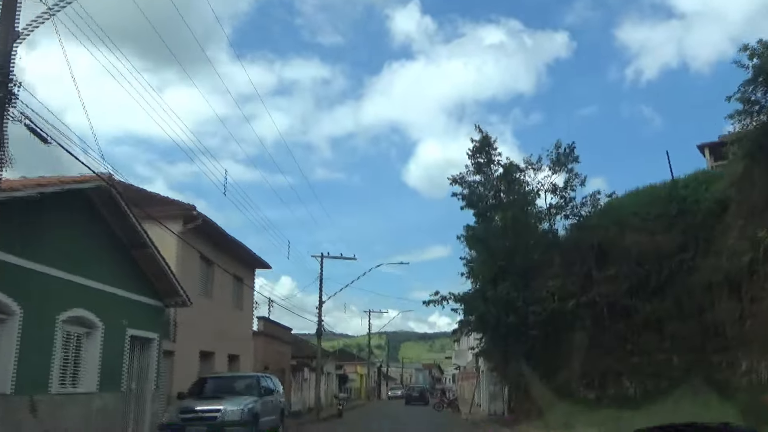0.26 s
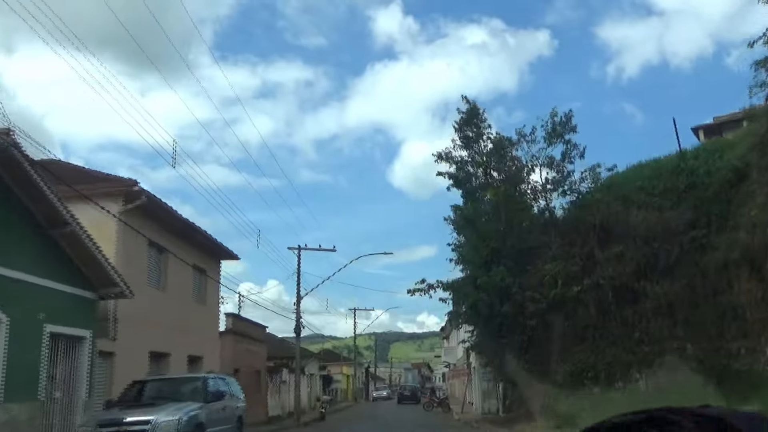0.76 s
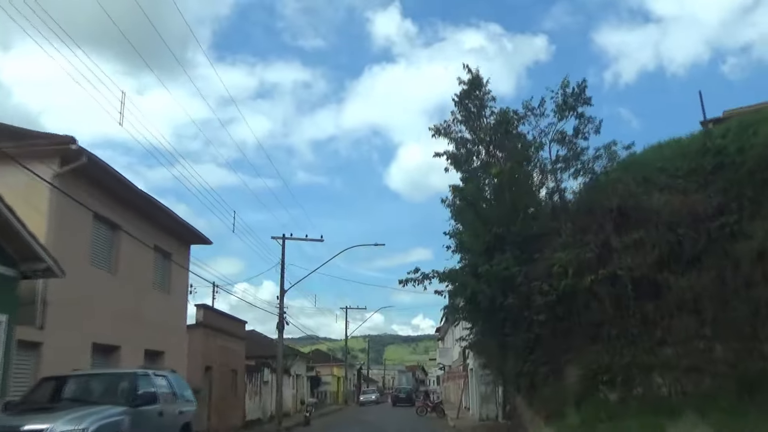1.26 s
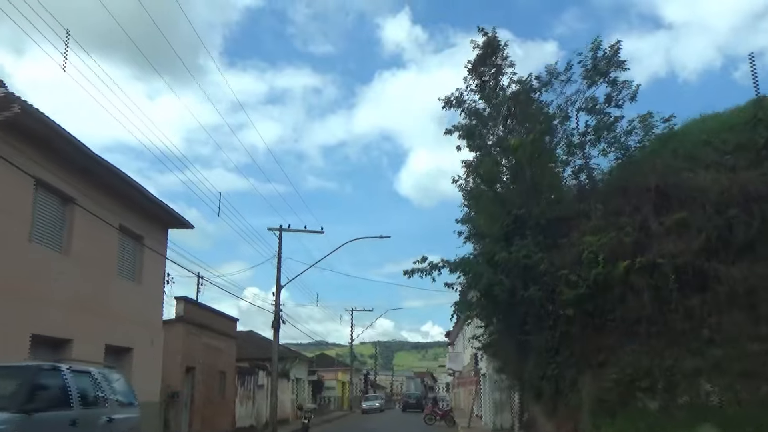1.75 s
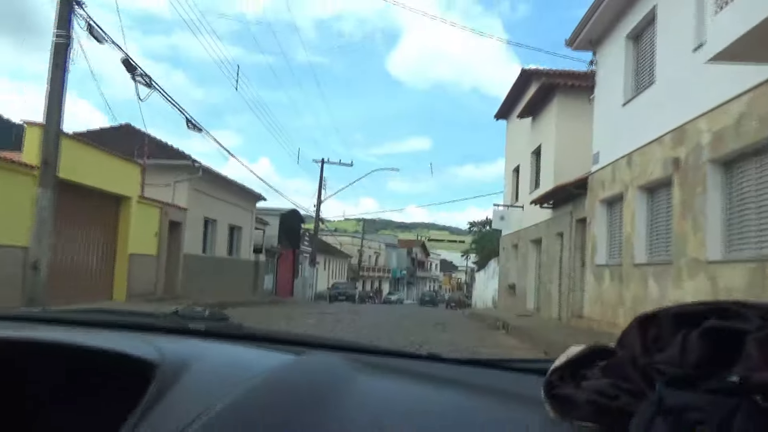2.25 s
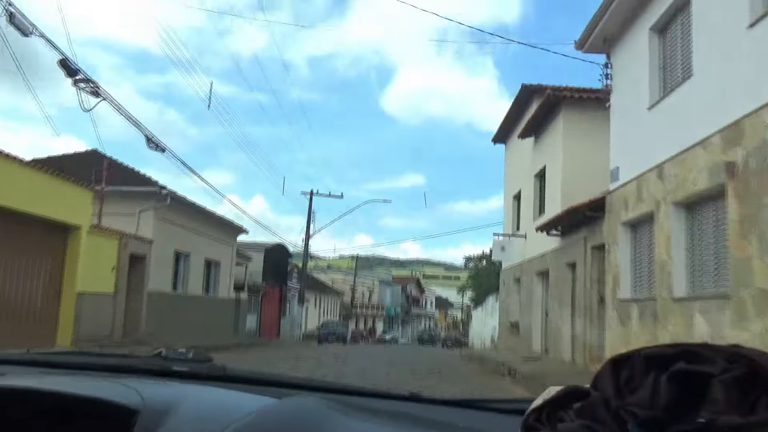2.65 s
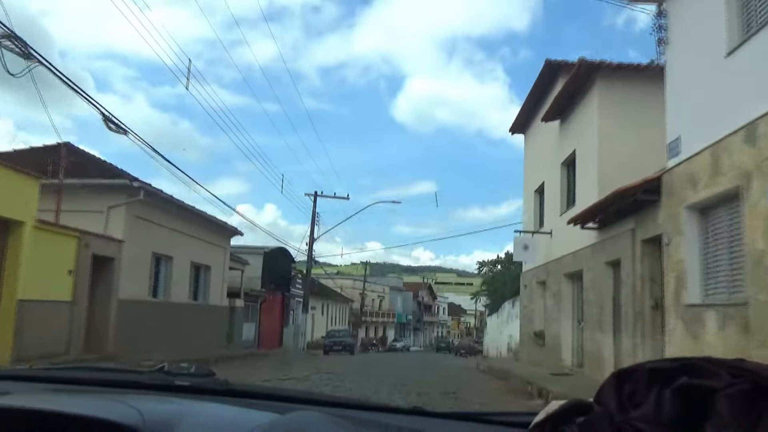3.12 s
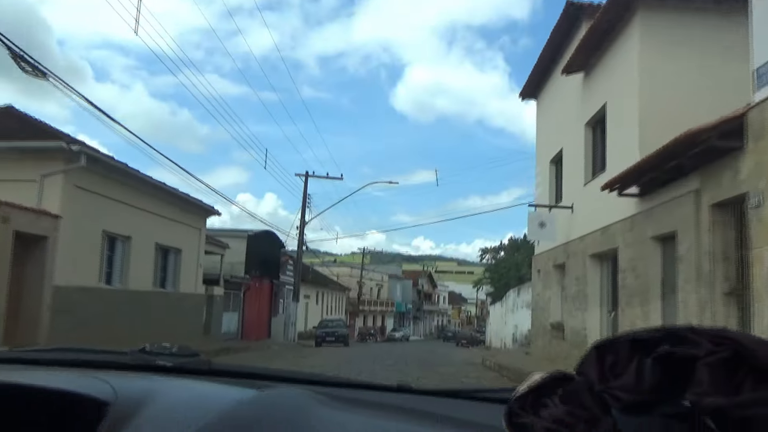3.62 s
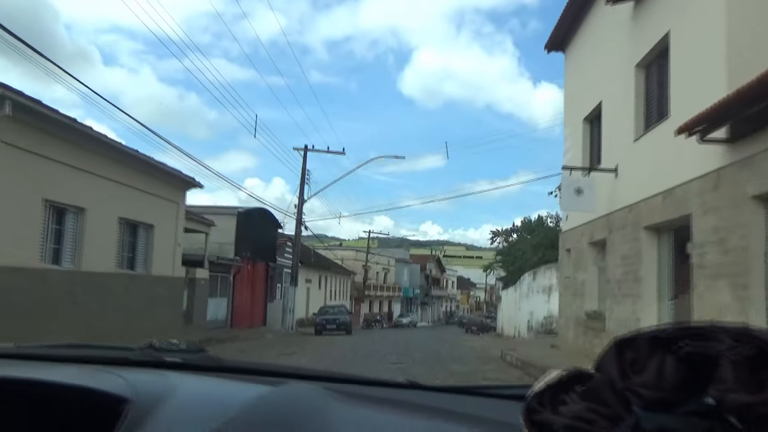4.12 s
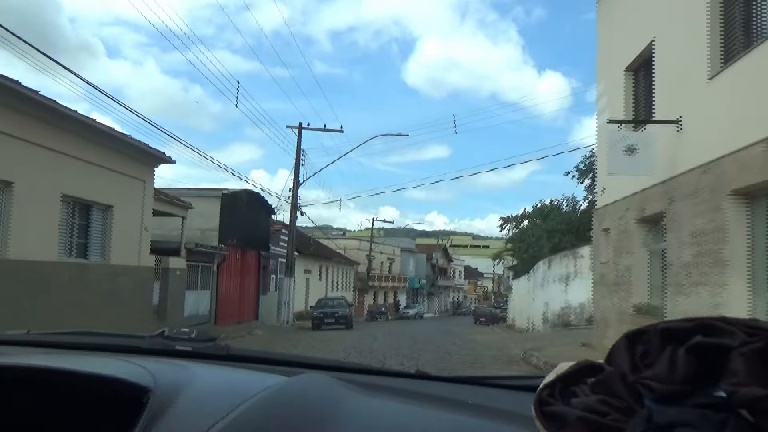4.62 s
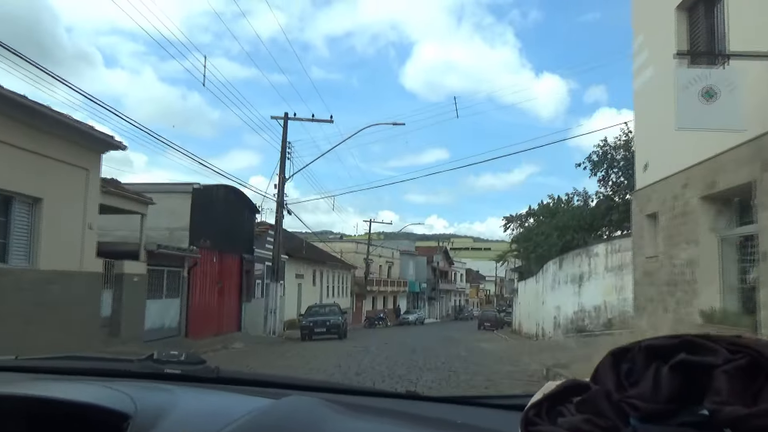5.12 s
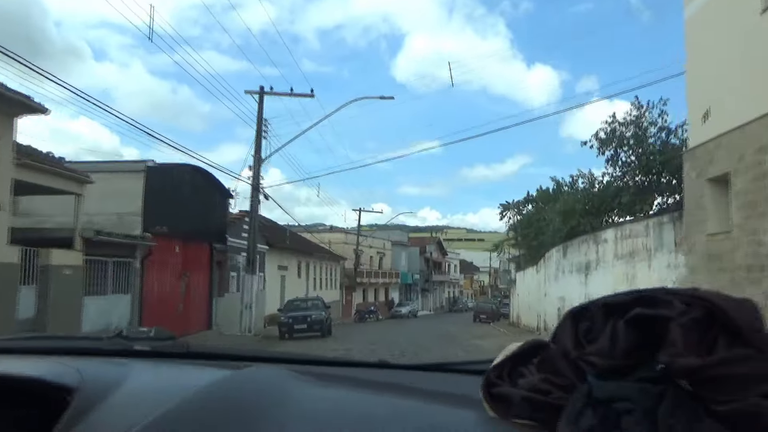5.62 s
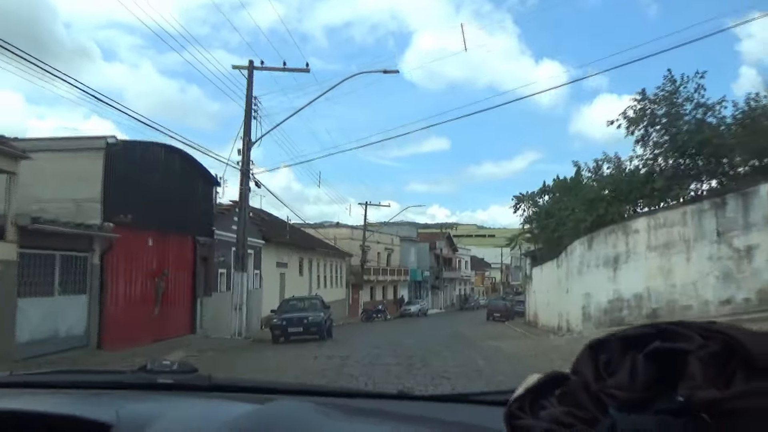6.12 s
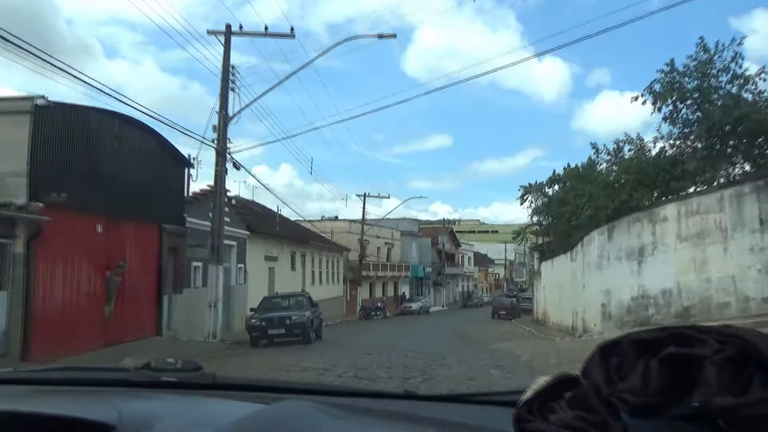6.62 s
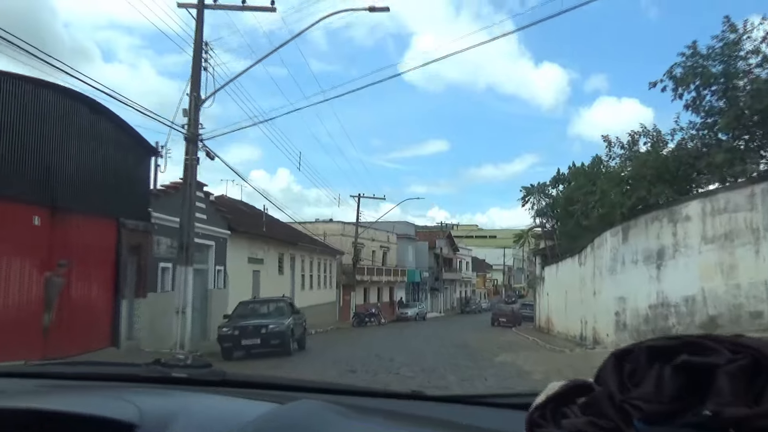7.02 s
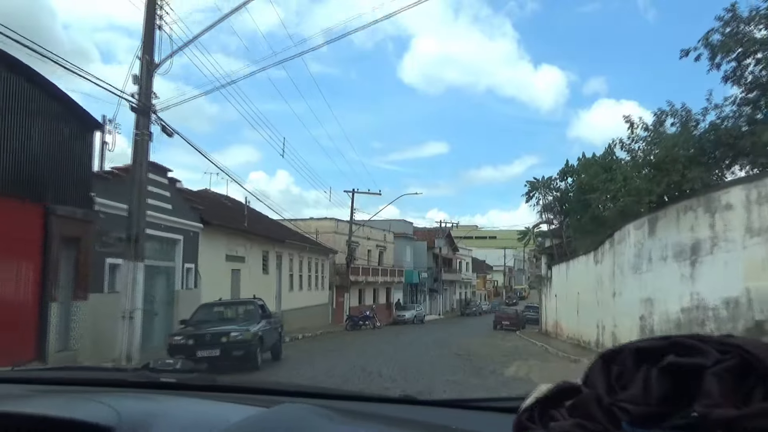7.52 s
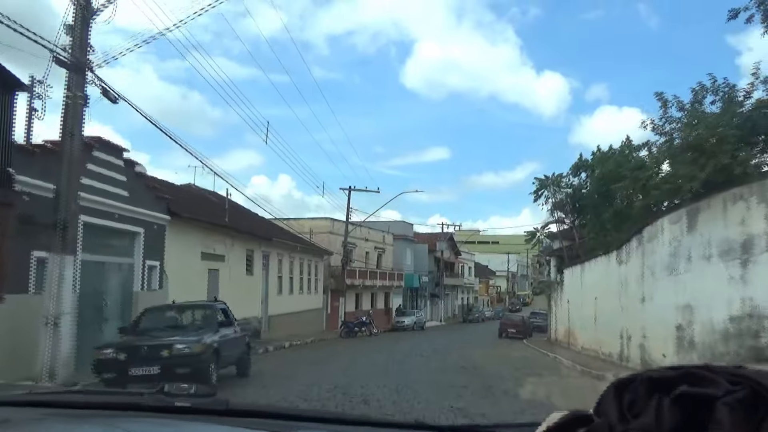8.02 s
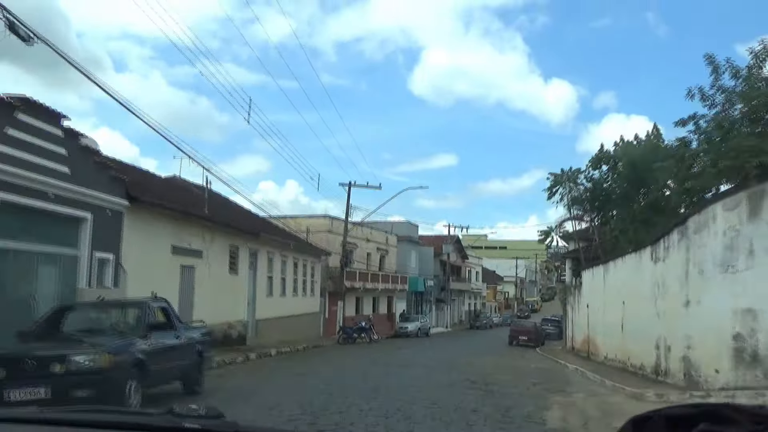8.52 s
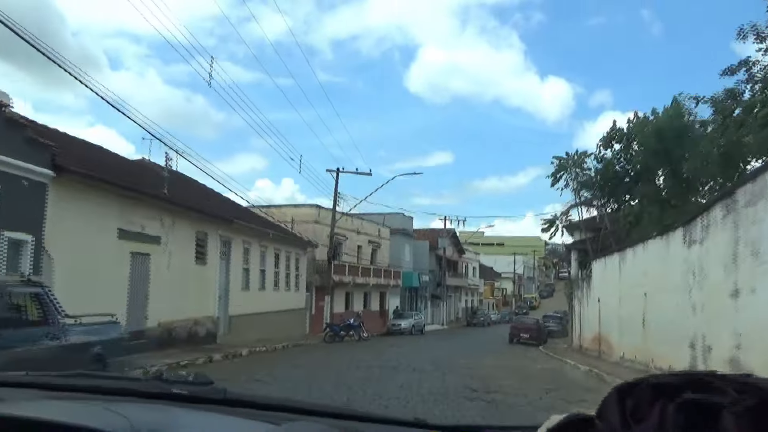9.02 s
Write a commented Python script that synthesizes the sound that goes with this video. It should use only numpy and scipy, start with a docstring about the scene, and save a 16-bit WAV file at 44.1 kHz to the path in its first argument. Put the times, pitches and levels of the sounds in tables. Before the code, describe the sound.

Close stereo pickup in a cabin: low boom swells and sags, stones thud dully under the floor, and hard trim raps and tiny ticks scatter on top, slightly to the right. Early bumps are busy, the middle calmer. High chirps, probably a bird outside, begin brightly after five seconds, echo off house walls and thin out before a rough cluster of jolts.

```python
"""A deep cabin boom, a drumming body shell and trim knocks open inside a car rolling slowly over cobblestones.
Gliding low tones make the boom; random stone joints drive modes of shell and floor pan; shaped noise roars.
Loose trim knocks and a small fitting ticks: noise bursts ring their modes. One dry click is a sudden step.
Thin swept-sine chirps, probably a bird's, pass by and fade; house walls echo them.
Two close microphone ports and a limiter pick it up."""
import sys
import numpy as np
from scipy import signal
from scipy.fft import rfft, irfft, next_fast_len
from scipy.io import wavfile
from scipy.ndimage import uniform_filter1d, minimum_filter1d, map_coordinates

SR = 44100
rng = np.random.default_rng(int(sys.argv[2]) if len(sys.argv) > 2 else 0)


def level_to_linear(level):
    """Convert decibel levels to linear amplitude factors, elementwise."""
    exponent = np.asarray(level, float) / 20
    return 10 ** exponent


def put_to_file(sound):
    """Save the sound as 16-bit audio at rate SR, in the file named by the first command-line argument."""
    columns = np.atleast_2d(sound).T  # one column per channel
    safe = np.clip(columns, -1, 1)
    whole_steps = np.round(safe * 32767)
    wavfile.write(sys.argv[1], SR, whole_steps.astype(np.int16))


N = 408366  # samples


def unit(x):
    """Scale to rms 1."""
    return x / np.sqrt(np.mean(x ** 2) + 1e-20)


def along(points, hz):
    """Interpolate (Hz, value) points on a log frequency axis."""
    f, v = np.transpose(points)
    return np.interp(np.log(hz + 1), np.log(f + 1), v)


def curves(rows):
    """One value per sample for each column after the time in seconds."""
    s, *cols = np.transpose(rows)
    return [np.interp(np.arange(N) / SR, s, c) for c in cols]


def wobble(knots_per_s):
    """A smooth random curve through normally distributed knots."""
    knots = rng.standard_normal(int(N * knots_per_s / SR) + 4)
    return map_coordinates(knots, [np.arange(N) * knots_per_s / SR])


def filtered(x, response):
    """Apply a complex response of frequency, zero-padded by half a second."""
    m = next_fast_len(N + SR // 2)
    return irfft(rfft(x, m) * response(np.fft.rfftfreq(m, 1 / SR)), m)[..., :N]


def resonances(modes):
    """Causal response of (Hz, width Hz, dB) modes, summed with alternating signs."""
    def response(f):
        total = 0
        for k, (centre, width, db) in enumerate(modes):
            damping = 1j * f * width
            total = total + (-1) ** k * level_to_linear(db) * damping / (centre * centre - f * f + damping)
        return total
    return response


def steady(x, window_s, firmness):
    """Rms 1, with part of the swelling over a window evened out."""
    power = np.abs(uniform_filter1d(unit(x) ** 2, max(int(window_s * SR), 1)))
    return unit(x / (power + 1e-3) ** (np.clip(firmness, 0, 1) / 2))


def stones(rate, spread_db, count):
    """Impulses of random force and sign as stone joints pass at random moments, rate per second."""
    draws = rng.random((count, 3))
    s = np.cumsum(-np.log(1 - draws[:, 0])) / rate
    force = level_to_linear(spread_db * 2 * draws[:, 1]) * np.sign(draws[:, 2] - .5)
    keep = s < (N - 1) / SR
    return np.bincount((s[keep] * SR).astype(int), force[keep], N)


def reflections(x, t60_s):
    """Diffuse reflections off cabin surfaces or house walls: a fresh decaying noise tail on each call."""
    t = np.arange(SR // 4) / SR
    tail = rng.standard_normal(len(t)) * level_to_linear(-60 * t / t60_s)
    return signal.fftconvolve(x, tail / np.linalg.norm(tail))[:N]


JUMP_S, JUMP_DB, JUMP_SETTLES_S = 1.96505, -21, .003  # dB of each side of the step


def jump():
    """A dry click: one sudden downward step with an exponential slope on both sides."""
    t = np.arange(N) / SR - JUMP_S
    return -level_to_linear(JUMP_DB) * np.sign(t) * np.exp(-np.abs(t) / JUMP_SETTLES_S)


# Thin whistle. Each row: time in seconds, frequency in Hz, level in dB before flutter.
WHISTLE = [(5.9, 5250, -90), (5.95, 5250, -66), (6.15, 5150, -66), (6.3, 5020, -68), (6.6, 4960, -69),
           (6.9, 4980, -70), (7.2, 5030, -68.5), (7.5, 5030, -69), (7.58, 5040, -76), (7.7, 5030, -72.5),
           (8.0, 5000, -73), (8.2, 5000, -90)]


def whistle():
    """A thin sine lingers between the later chirps, unsteady in level and pitch."""
    hz, db = curves(WHISTLE)
    level = level_to_linear(db + 3.8 * wobble(18) + 3 * wobble(120))
    phase = 2 * np.pi * np.cumsum(hz + 32 * wobble(15) + 55 * wobble(200)) / SR
    return np.sqrt(2) * level * np.sin(phase)


# Chirps in the street. Each row: start in seconds, length in seconds, top frequency in Hz, relative level in dB.
CHIRPS = [(5.69, .113, 5800, -49.5), (5.89, .1, 5400, -55), (6.03, .075, 5380, -54),
          (6.205, .07, 5130, -60), (6.33, .07, 5190, -57.5), (6.445, .05, 5070, -55.5),
          (6.575, .06, 5060, -61), (6.69, .06, 5060, -63), (6.81, .06, 5100, -66), (6.925, .07, 5050, -61),
          (7.06, .07, 5070, -65), (7.19, .07, 5060, -65), (7.31, .07, 5060, -68), (7.43, .08, 5070, -69),
          (7.62, .07, 5060, -66), (7.765, .06, 4950, -64), (7.9, .08, 5050, -69), (8.1, .05, 4950, -65)]
CHIRP_RISE_HZ_PER_S, CHIRP_SAG_HZ_PER_S = 2800, 5000  # times the chirp length: rise to and sag from the top
CHIRP_TOP_AT = .5  # share of the length
HOARSE_FROM_S, HOARSE_S = 5.78, .2  # the voice roughens as the car draws away
ECHO_S, ECHO_DB = .058, -7.5  # between the house walls
STREET_DB, STREET_T60_S = -5.5, .36  # house walls smear the chirps


def chirps():
    """Arched sine sweeps with a weak octave; walls repeat them twice and smear them."""
    out, t = np.zeros(N), np.arange(N) / SR
    hoarse = np.clip((t - HOARSE_FROM_S) / HOARSE_S, .25, 1)
    flutter = level_to_linear(3 * hoarse * wobble(150) + 1.5 * wobble(40))
    waver_hz = 70 * hoarse * wobble(250)
    for s, length_s, top_hz, db in CHIRPS:
        u = np.arange(round(length_s * SR)) / (length_s * SR)
        at = slice(round(s * SR), round(s * SR) + len(u))
        rise = np.maximum(1 - u / CHIRP_TOP_AT, 0)
        sag = np.maximum((u - CHIRP_TOP_AT) / (1 - CHIRP_TOP_AT), 0)
        hz = top_hz - CHIRP_RISE_HZ_PER_S * length_s * rise ** 2 - CHIRP_SAG_HZ_PER_S * length_s * sag ** 3
        phase = 2 * np.pi * np.cumsum(hz + waver_hz[at]) / SR
        arch = np.sin(np.pi * u ** .8) ** (.4 + .8 * hoarse[at])
        voice = np.sin(phase) + level_to_linear(-26) * np.sin(2 * phase)
        out[at] += level_to_linear(db) * arch * flutter[at] * voice
    echoes = sum(level_to_linear(k * ECHO_DB) * np.roll(out, round(k * ECHO_S * SR)) for k in range(3))
    return np.sqrt(2) * (echoes + level_to_linear(STREET_DB) * reflections(out, STREET_T60_S))


# Cabin boom. Each row: time in seconds, frequency in Hz, level in dB, unsteadiness in dB (sign ignored).
BOOM = [(0.0, 33.15, -18.5, 12), (0.23, 33.85, -18, -1), (0.39, 28.5, -22, 3.5), (0.49, 29, -13, 0.5),
        (0.59, 31.8, -24, 9), (0.9, 26.07, -18.5, -4), (1.37, 26.9, -24, -0.5), (1.49, 29.34, -22, 11),
        (1.96, 31.07, -20, -1.5), (2.11, 31.5, -19, 9), (2.21, 28.85, -24, 6.5), (2.63, 29.03, -19.5, 6.5),
        (2.99, 31.5, -23.5, 9), (3.53, 31.42, -27, 13), (3.63, 30.16, -14, 2), (4.2, 29.96, -19.5, 4.5),
        (4.54, 33.91, -20.5, 5), (4.72, 34.32, -17.5, 5.5), (4.85, 28.96, -19, 2), (5.67, 31.69, -19.5, 2),
        (5.93, 30.1, -17.5, 5.5), (6.47, 30.38, -14.5, 0.5), (6.63, 28.86, -18.5, -2),
        (6.89, 32.13, -23, -5), (7.07, 27.27, -13, 9), (7.37, 27.22, -26.5, 0), (7.56, 31.54, -17.5, 7),
        (8.28, 31.87, -18.5, 2.5), (8.49, 33.7, -17.5, 3), (9.26, 35.5, -18.5, -0.5)]


def boom():
    """The cabin air rocks at its lowest mode, wandering in phase; stone joints stir the modes beside it."""
    hz, db, unsteady_db = curves(BOOM)
    db = db + np.abs(unsteady_db) * np.minimum(wobble(16), 1.2)
    phase = 2 * np.pi * np.cumsum(hz) / SR + 0.47 * wobble(12)
    joints = stones(40, spread_db=0.5, count=2000)
    beside = filtered(joints, resonances([(23, 6.3, -8.5), (43.3, 13.0, 7.5)]))
    beside = unit(filtered(beside, resonances([(32.8, 49, 0)])))
    return level_to_linear(db + 1.6 * wobble(30)) * np.sqrt(2) * np.sin(phase) + level_to_linear(-27.5) * beside


# Narrow resonance in the roar. Each row: time in seconds, level in dB on even stones.
HOLLOW = [(0, -52), (1.2, -48.5), (2.4, -51), (3.5, -49.5), (4.6, -50), (5.6, -47.5), (6.4, -46),
          (7.4, -44), (8, -47), (8.7, -47), (9.26, -53)]
HOLLOW_HZ, HOLLOW_WIDTH_HZ = 732, 42


def hollow(lift_db):
    """Grit drives one narrow resonance of the floor almost steadily."""
    mode = resonances([(HOLLOW_HZ, HOLLOW_WIDTH_HZ, 0)])
    ring = steady(filtered(rng.standard_normal(N), mode), window_s=0.035, firmness=0.26)
    return level_to_linear(curves(HOLLOW)[0] + 0.59 * lift_db) * ring


def rush(spectrum, patchy_db, grit):
    """Noise plus fine grit, in time-frequency patches of random gain, shaped to a spectrum at rms 1."""
    z = signal.stft(rng.standard_normal(N) + grit, nperseg=512)[2]
    field = uniform_filter1d(uniform_filter1d(rng.standard_normal(z.shape), 6, 0), 8, 1)
    x = signal.istft(z * level_to_linear(patchy_db * unit(field)), nperseg=512)[1][:N]
    return unit(filtered(x, lambda hz: level_to_linear(along(spectrum, hz))))


# Road roar on even stones. Each row: time in seconds, level in dB.
ROAD = [(0.0, -42), (0.36, -41), (0.82, -42.5), (1.49, -42), (2.53, -42.5), (4.0, -41), (5.7, -43),
        (6.32, -41.5), (6.96, -43), (7.25, -41), (7.5, -43.5), (9.26, -42)]
# Rustle in the treble. Each row: time in seconds, relative level in dB.
RUSTLING = [(0.0, -61), (0.49, -67), (1.06, -63), (1.52, -67.5), (2.73, -63), (3.17, -67), (3.89, -62.5),
            (5.39, -67.5), (6.89, -65), (7.45, -69.5), (8.28, -64.5), (8.46, -62), (9.1, -66.5),
            (9.26, -62)]
# Spectra of roar, trim buzz and rustle. Each row: frequency in Hz, relative density in dB per Hz.
ROAR_SPECTRUM = [(290, -15), (500, -2), (596, -6), (742, -2), (858, -7), (1070, -8), (1190, -19),
                 (1600, -20.5), (2080, -31.5), (3520, -120)]
BUZZ_SPECTRUM = [(710, -31), (1200, -0.5), (3910, -15), (7000, -21.5), (9100, -49.5), (15400, -120)]
RUSTLE_SPECTRUM = [(3000, -40), (5500, -12), (7500, 0), (8600, 1), (10000, -4.5), (12000, -11.5),
                   (14500, -18), (16000, -45.5)]
BUZZ_OVER_ROAR_DB = -10


def road(lift_db):
    """Roar through the floor, the buzz of many tiny contacts and a rustle swell with the same jolts."""
    (even_db,), (rustle_db,) = curves(ROAD), curves(RUSTLING)
    roar_db = even_db + lift_db
    buzz_db = roar_db + BUZZ_OVER_ROAR_DB
    jolt = wobble(14)
    roar_grit = .5 * unit(stones(150, spread_db=2.5, count=5000))
    buzz_grit = 0.32 * unit(stones(200, spread_db=6.0, count=6000))
    rustle_grit = .2 * unit(stones(300, spread_db=0.0, count=9000))
    roar = rush(ROAR_SPECTRUM, patchy_db=1.5, grit=roar_grit)
    buzz = rush(BUZZ_SPECTRUM, patchy_db=2.0, grit=buzz_grit)
    rustle = rush(RUSTLE_SPECTRUM, patchy_db=1.2, grit=rustle_grit)
    return (level_to_linear(roar_db + 0.3 * jolt) * roar
            + level_to_linear(buzz_db + 0.62 * jolt + 0.64 * wobble(30)) * buzz
            + level_to_linear(rustle_db + 1.5 + 2.0 * jolt + 1.8 * wobble(24)) * rustle)


# Raised stones. Each row: start in seconds, length in seconds, floor pan level in dB, road roar level in dB.
BUMPS = [(0, 0.033, -28.5, -36.5), (0.093, 0.079, -29, -35.5), (0.202, 0.09, -27, -38.5),
         (0.62, 0.03, -32, -42.5), (0.804, .05, -32.5, -45), (0.839, 0.094, -31, -36.5),
         (1, 0.079, -32.5, -51), (1.305, 0.091, -35.5, -44.5), (1.813, .11, -31, -41.5),
         (2.195, 0.019, -38, -49), (3.795, 0.077, -32.5, -42.5), (3.934, 0.064, -31.5, -46.5),
         (4.199, 0.073, -46, -41.5), (5.15, 0.11, -33, -47), (5.642, 0.036, -45, -49),
         (5.811, 0.051, -30.5, -45), (5.939, 0.071, -29, -38.5), (6.435, 0.075, -40, -46.5),
         (6.654, 0.042, -27.5, -39.5), (6.746, 0.03, -30, -48), (7.283, 0.085, -31, -52),
         (7.766, 0.068, -31, -44), (8.117, 0.051, -32, -47), (8.204, 0.076, -31.5, -48.5),
         (8.32, 0.07, -28.5, -36), (8.38, 0.088, -28.5, -38), (8.505, 0.044, -26, -49.5),
         (8.57, 0.12, -31, -44), (8.761, 0.12, -32, -38), (9.072, 0.033, -31, -46), (9.147, 0.12, -34, -44)]
BUMP_EDGE_S = 0.025  # rise and fall
PAN_OVER_ROAR_DB = 7  # on even stones


def bumps():
    """How far wheels on raised stones lift pan and roar over their even-stone levels, in dB."""
    t = np.arange(N) / SR
    even_db = curves(ROAD)[0] + [[PAN_OVER_ROAR_DB], [0]]

    def edge(u):
        return 1 / (1 + np.exp(-np.clip(4 * u / BUMP_EDGE_S, -40, 40)))

    power = 0
    for s, length_s, *db in BUMPS:
        power = power + level_to_linear(2 * np.array(db)[:, None]) * edge(t - s) * edge(s + length_s - t)
    return 10 * np.log10(1 + power / level_to_linear(2 * even_db))


# Drumming of the shell. Each row: time in seconds, level in dB on even stones.
DRUM = [(0.0, -23.5), (0.13, -16), (0.74, -22.5), (0.87, -16), (0.9, -20.5), (1.31, -20.5), (1.39, -15),
        (1.44, -26), (1.49, -13.5), (1.57, -21), (1.88, -15.5), (2.11, -22), (2.16, -17.5), (2.32, -24.5),
        (2.34, -18), (2.4, -25.5), (2.47, -18.5), (2.91, -22.5), (3.22, -19), (3.3, -27), (3.35, -19),
        (3.89, -23), (3.97, -14.5), (4.15, -25.5), (4.23, -16), (4.33, -28), (4.38, -17.5), (4.46, -25.5),
        (4.56, -13), (4.64, -22.5), (4.72, -17.5), (4.87, -23), (4.9, -21.5), (5.39, -20.5), (5.54, -16.5),
        (5.62, -31), (5.67, -19), (5.75, -17), (5.77, -24), (5.85, -15.5), (5.98, -22), (6.09, -16),
        (6.11, -29.5), (6.19, -19), (6.65, -22.5), (6.78, -16), (6.86, -19.5), (6.91, -14), (7.02, -21),
        (7.32, -23), (7.35, -12), (7.4, -25.5), (7.48, -18), (8.12, -21.5), (8.43, -20.5), (9.03, -20.5),
        (9.1, -17.5), (9.13, -31), (9.21, -14.5), (9.26, -14)]
# Body shell modes. Each row: frequency in Hz, width in Hz, relative gain in dB.
SHELL = [(49.7, 17.3, -12.5), (105.94, 12.2, 1), (128, 24.4, -2), (166.2, 45.4, -9), (199, 40.6, -14.5)]
DRUM_FOLLOWS = 0.39  # share of the pan's lift in dB


def drum(lift_db):
    """Stone joints thump the tyres and set the shell modes drumming."""
    shell = filtered(stones(120, spread_db=0.0, count=4000), resonances(SHELL))
    shell = filtered(shell, resonances([(98.0, 350, 0)]))  # rubber softens each thump
    level = level_to_linear(curves(DRUM)[0] + DRUM_FOLLOWS * lift_db + 0.49 * wobble(25))
    return level * steady(shell, window_s=.04, firmness=0.49)


# Floor pan modes. Each row: frequency in Hz, width in Hz, gain in dB.
PAN = [(197, 36.6, 3), (310.4, 47.5, -4), (332.5, 18, -0.5), (411.6, 68, -5.5), (493.5, 87, -11.5)]


def thud(lift_db):
    """Stone joints knock the floor pan modes, duller than the roar."""
    pan = filtered(stones(250, spread_db=5, count=8000), resonances(PAN))
    pan = filtered(pan, resonances([(317.5, 310, 0)]))
    level = level_to_linear(curves(ROAD)[0] + PAN_OVER_ROAR_DB + lift_db + 1.2 * wobble(20))
    return level * steady(pan, window_s=0.12, firmness=0.24)


# Single stones knock the floor pan. Each row: time in seconds, relative level in dB, frequency in Hz.
THUMPS = [(.144, -21, 261), (.202, -19, 275), (.228, -22, 423), (.622, -22, 320), (.864, -20, 315),
          (.889, -19, 400), (.925, -21, 430), (2.209, -26, 269), (4.545, -24, 336), (5.798, -22, 275),
          (5.951, -22, 272), (5.998, -20, 440), (6.552, -22, 420), (7.122, -24, 409), (8.12, -19, 440),
          (8.231, -24, 291), (8.32, -20, 404), (8.343, -13, 290), (8.371, -18, 393), (8.412, -16, 290),
          (8.433, -15, 380), (9.085, -23, 291)]
THUMP_T60_S, THUMP_RISE_S, THUMP_PAN_DB = .075, .0015, 14
THUMP_OVERTONE, THUMP_OVERTONE_DB = 2.5, -11  # frequency ratio and level of a higher mode of the same spot


def blows():
    """A short dull knock with the colour of the spot that is hit; the pan's own modes ring after it."""
    out, hits, t = np.zeros(N + SR), np.zeros(N), np.arange(SR // 10) / SR
    for s, db, hz in THUMPS:
        envelope = level_to_linear(db - 60 * t / THUMP_T60_S) * (1 - np.exp(-t / THUMP_RISE_S))
        overtone = level_to_linear(THUMP_OVERTONE_DB) * np.sin(2 * np.pi * THUMP_OVERTONE * hz * t)
        out[round(s * SR):][:len(t)] += envelope * (np.sin(2 * np.pi * hz * t) + overtone)
        hits[round(s * SR)] = level_to_linear(db + THUMP_PAN_DB)
    pan = filtered(filtered(hits, resonances(PAN)), resonances([(420, 600, 0)]))
    return out[:N] + pan


# Small trim pings. Each row: time in seconds, level in dB before the soft onset, frequency in Hz.
PINGS = [(1.7873, -40, 2348), (3.0879, -37, 2450), (3.676, -38, 2430), (4.7295, -44.5, 2629),
         (7.768, -36.5, 2483), (8.296, -41, 2380), (8.401, -26, 2364), (8.676, -39, 2450)]


def pings():
    """A light tap that wakes one panel mode only: a decaying sine."""
    out, t = np.zeros(N + SR), np.arange(SR // 20) / SR
    for s, db, hz in PINGS:
        ring = level_to_linear(db - 60 * t / 0.04) * (1 - np.exp(-t / .001)) * np.sin(2 * np.pi * hz * t)
        out[round(s * SR):round(s * SR) + len(t)] += ring
    return out[:N]


# Bright cracks. Each row: time in seconds, relative level in dB.
CRACKS = [(0.0638, -50), (1.0291, -52), (2.2094, -45), (2.2827, -34.5), (2.3286, -52.5), (2.6733, -45),
          (3.8526, -44), (5.9519, -50.5), (8.2312, -45), (8.3998, -44.5), (8.4701, -40)]
# Crack spectrum. Each row: frequency in Hz, relative density in dB per Hz.
CRACK_SPECTRUM = [(7000, -34), (11000, 3), (13000, -3), (15500, -4.5), (17000, -29.5)]
CRACK_T60_S = .005


def cracks():
    """A few hard contacts begin with a dry crack: a very short burst of treble noise."""
    out, t = np.zeros(N + SR), np.arange(SR // 100) / SR
    for s, db in CRACKS:
        burst = level_to_linear(db - 60 * t / CRACK_T60_S) * unit(rng.standard_normal(len(t)))
        out[round(s * SR):round(s * SR) + len(t)] += burst
    return level_to_linear(7.0) * filtered(out[:N], lambda hz: level_to_linear(along(CRACK_SPECTRUM, hz)))


# Trim panel knocks. Each row: time in seconds, then relative levels of snap, panel and sharp edge in dB,
# nominal chatter t60 in seconds.
KNOCKS = [(0.016, -25.5, -30, -50, 0.03), (0.064, -24.5, -31, -50, 0.051), (0.08, -24, -32, -49, .042),
          (0.269, -31.5, -37, -68, 0.03), (0.287, -30, -39, -60, .019), (0.4314, -38.5, -39, -60, 0.095),
          (0.563, -22, -29, -49.5, 0.057), (0.635, -30, -33, -63, 0.066), (0.729, -38, -34, -63, 0.045),
          (0.7892, -22.5, -30, -52, 0.043), (0.8372, -29, -34, -63, 0.059), (0.862, -40, -32, -70, .04),
          (0.93, -40, -38, -72, 0.045), (0.8944, -23, -40, -48.5, 0.025),
          (0.905, -27.5, -25.5, -53.5, 0.021), (0.958, -39, -37, -72, .046),
          (1.0292, -23.5, -28, -48.5, 0.057), (1.0883, -33, -31.5, -63, 0.033),
          (1.111, -39, -38, -73, .027), (1.143, -30.5, -31.5, -59, 0.037), (1.267, -24.5, -30, -63, 0.057),
          (1.3533, -50, -39, -73, 0.051), (1.621, -40, -55, -59, .034), (1.787, -41, -38, -75, .027),
          (1.824, -38.5, -36, -68, .05), (1.8686, -41, -37.5, -63, .04), (1.9911, -25.5, -30, -61, 0.043),
          (2.022, -54, -40, -79.5, 0.02), (2.0607, -54, -39, -80, 0.065), (2.2091, -21.5, -26, -61, 0.055),
          (2.2473, -37, -49, -50, 0.038), (2.256, -29, -42, -62, 0.041), (2.283, -32, -44, -49.5, 0.012),
          (2.3088, -37, -36, -61, 0.034), (2.3297, -14, -29.5, -61.5, 0.02), (2.408, -44, -38.5, -69, 0.18),
          (2.6737, -14.5, -31.5, -42.5, 0.0078), (2.811, -32.5, -47, -48.5, 0.08),
          (3.0877, -42, -51, -77, 0.044), (3.575, -44, -46, -55.5, 0.03),
          (3.6763, -38, -45.5, -55.5, 0.065), (3.7565, -27, -36, -61, .016),
          (3.7902, -25.5, -28, -58, 0.047), (3.854, -23, -34, -50, 0.061),
          (3.9588, -23, -28.5, -58.5, 0.037), (4.056, -24.5, -28, -59, 0.045),
          (4.1216, -37, -62, -61, .027), (4.2597, -27, -30.5, -53, 0.067), (4.3462, -31, -29.5, -69, 0.1),
          (4.5459, -22, -25, -62, 0.039), (4.9344, -23.5, -29, -66, 0.04), (5.4688, -38, -52, -56.5, .021),
          (5.678, -23, -28, -51, 0.045), (5.8, -45, -40, -73, 0.021), (5.9176, -31, -52, -72, .043),
          (5.9522, -17.5, -26, -46.5, 0.041), (6.0091, -33, -58, -65, 0.039),
          (6.17, -27.5, -30.5, -62, 0.037), (6.2351, -25, -32, -68, 0.026), (6.34, -40, -38.5, -79, .046),
          (6.5513, -41, -30.5, -74, .031), (6.649, -37, -43, -65, .053), (6.6607, -40, -51, -57.5, 0.041),
          (6.7326, -28.5, -31, -70, 0.064), (7.126, -20.5, -23.5, -51.5, 0.031),
          (7.357, -21.5, -29.5, -44, 0.045), (7.41, -42, -50, -80, 0.05), (7.765, -38, -48, -66, 0.051),
          (7.8918, -39.5, -43, -67, 0.17), (8.2317, -18.5, -30.5, -42, 0.039),
          (8.321, -32.5, -41, -54, 0.11), (8.343, -42, -34.5, -70, .04), (8.3778, -33, -39, -55, .042),
          (8.4, -19, -30, -37, 0.046), (8.439, -37, -46.5, -56, 0.035), (8.454, -38, -34.5, -59, 0.025),
          (8.47, -16, -29.5, -42, 0.01), (8.4862, -29, -35, -50, 0.051), (8.607, -29, -32.5, -53.5, 0.034),
          (8.674, -44, -40, -69, 0.052), (8.706, -43, -39.5, -62, 0.031), (8.802, -37, -36, -51.5, 0.32),
          (8.8514, -36, -37, -58, 0.14), (8.8767, -36, -37, -63, .046), (9.055, -55, -51, -68, .04),
          (9.143, -41, -46, -62, .046)]
# The fitting ticks against its seat. Each row: time in seconds, relative fitting level in dB.
TICKS = [(0.121, -43.5), (0.2383, -46.5), (0.7105, -49), (0.7496, -42.5), (0.881, -40), (0.918, -41.5),
         (0.989, -43), (1.0796, -47), (1.12, -42.5), (1.161, -40.5), (1.202, -44), (1.241, -40.5),
         (1.282, -48), (1.413, -45.5), (1.455, -45.5), (2.621, -49), (2.852, -41.5), (2.893, -46.5),
         (3.3388, -48.5), (3.4598, -47), (3.8947, -43.5), (3.9263, -49), (4.154, -46.5), (4.1998, -41),
         (4.239, -44.5), (4.282, -47), (4.4037, -42), (4.444, -41.5), (4.486, -50.5), (4.847, -47.5),
         (4.8726, -52), (4.895, -42), (4.9752, -45), (5.0117, -44.5), (5.052, -40), (5.2375, -43.5),
         (5.2763, -46), (5.318, -49.5), (5.43, -47.5), (5.5102, -54), (5.935, -39), (5.975, -39.5),
         (6.088, -48), (6.3888, -45.5), (7.0192, -50.5), (7.058, -42.5), (7.154, -44.5), (7.2, -45.5),
         (8.1757, -53), (8.284, -43.5), (8.3902, -48), (8.5142, -45), (8.583, -41), (8.6254, -42)]
KNOCK_FITTING_DB = -19.5  # how much of a knock's snap reaches the fitting
TICK_SNAP_DB, TICK_PANEL_DB, TICK_EDGE_DB, TICK_T60_S = 7, -0.5, -17.5, 0.056  # levels over the fitting
FAINT_PER_S, FAINT_DB, FAINT_SPREAD_DB = 4, -47, 1.6  # base level and spread, offset and scaled per part


def contacts():
    """Rows of (s, snap, panel, fitting, edge dB, t60 s) for knocks, ticks and faint random touches."""
    rows = [(s, snap, panel, snap + KNOCK_FITTING_DB, edge, t60) for s, snap, panel, edge, t60 in KNOCKS]
    for s, db in TICKS:
        rows.append((s, db + TICK_SNAP_DB, db + TICK_PANEL_DB, db, db + TICK_EDGE_DB, TICK_T60_S))
    draws = rng.standard_normal((60, 6))
    s = np.cumsum(draws[:, 0] ** 2 + draws[:, 1] ** 2) / 2 / FAINT_PER_S  # exponential gaps
    db = FAINT_DB + FAINT_SPREAD_DB * draws[:, 2:] * [1, 1.3, 1.8, 2] + [6.5, 1.5, -7, -18.0]
    return rows + [(at, *level, TICK_T60_S) for at, level in zip(s, db) if at < N / SR]


# Trim panel and fitting modes. Each row: frequency in Hz, width in Hz, gain in dB.
PANEL = [(480, 79, 2.5), (780, 120, 0.5), (1092, 55, 7), (1457, 170, -2), (1790, 160, -2), (2026, 93, 0),
         (2355, 124, 0), (2660, 130, -2.5), (3005, 71, -1.5), (3570, 100, -5.5), (4250, 45, -8),
         (4400, 90, -20), (4870, 73, -14.5), (5980, 130, -22)]
FITTING = [(3324, 92, 0), (3855, 84, -1.5), (4380, 130, -4.5), (5340, 360, -2.5), (6090, 220, -4),
           (6660, 170, -3), (7100, 88, -16), (7100, 130, -3), (8920, 85, -7), (9960, 110, -12.5)]
# Snap and sharp edge of a hard contact. Each row: frequency in Hz, relative density in dB per Hz.
SNAP_SPECTRUM = [(300, -19.5), (1000, 0.5), (3000, 6.5), (6000, 1.5), (9000, -4), (12000, -30),
                 (16000, -39)]
EDGE_SPECTRUM = [(5000, -33), (8000, 8.5), (10000, 4), (12500, -7), (15000, -25.5), (16500, -28.5)]
BLOW_SHARE = 0.5  # first clean blow over the chatter that follows


def rattles():
    """Each contact snaps, then chatters briefly against the panel and the fitting, which ring."""
    drive, t = np.zeros((4, N + SR)), np.arange(SR // 10) / SR  # rows: snap, panel, fitting, edge
    for s, snap_db, panel_db, fitting_db, edge_db, t60_s in contacts():
        t60_s = max(t60_s, .005)
        dying_db = -60 * t / t60_s * [[1.1], [.9], [.7], [1.3]]
        bounces = level_to_linear(1.3 * np.repeat(rng.standard_normal(len(t) // 30), 30))  # the parts touch unevenly
        first_touch = 1 + 0.37 * np.exp(-t / 0.00013)  # the first touch is hardest
        shape = level_to_linear(dying_db) * (1 - np.exp(-t / 0.00009)) * first_touch
        strength = np.linalg.norm(shape, axis=1, keepdims=True)
        chatter = shape * bounces * rng.standard_normal((4, len(t)))
        chatter *= strength / np.linalg.norm(chatter, axis=1, keepdims=True)
        chatter[:3, 3] += BLOW_SHARE * strength[:3, 0]
        chatter[1:] *= np.sqrt(0.033 / t60_s)  # a short contact spends the same energy faster
        chatter *= level_to_linear([[snap_db - 10.0], [panel_db + 11], [fitting_db + 14.5], [edge_db + 10.5]])
        drive[:, round(s * SR):round(s * SR) + len(t)] += chatter
    snap, panel, fitting, edge = drive[:, :N]
    contact = filtered(snap, lambda hz: level_to_linear(along(SNAP_SPECTRUM, hz)))
    contact = contact + filtered(edge, lambda hz: level_to_linear(along(EDGE_SPECTRUM, hz)))
    panel_ring = filtered(panel, lambda hz: resonances(PANEL)(hz) / (1 + (hz / 9000) ** 4))
    fitting_ring = filtered(fitting, lambda hz: resonances(FITTING)(hz) / (1 + (hz / 11500) ** 6))
    # panel and fitting both sit to the right, the panel further
    return contact + panel_ring * level_to_linear([[-1.2], [1.2]]) + fitting_ring * level_to_linear([[-.7], [.7]])


# Between the ports. Each row: frequency in Hz, share of unrelated sound in dB.
DIFFUSE = [(30, -22), (120, -16), (300, -9), (750, -6), (1500, -5), (3000, -6), (6000, -8.5), (10000, -10)]


def scene():
    """Sound comes from all around: a second draw of most layers, opposite in sign, parts the ports."""
    pan_db, roar_db = bumps()

    def spread_layers():
        floor = hollow(roar_db) + drum(pan_db) + thud(pan_db) + road(roar_db)
        return floor + chirps() + whistle() + cracks()

    mid = boom() + blows() + spread_layers() + rattles() + pings()
    around = spread_layers() + level_to_linear(-2.5) * reflections(rattles().mean(0), t60_s=0.024)
    return mid + [[1], [-1]] * filtered(around, lambda hz: level_to_linear(along(DIFFUSE, hz)))


# Between the ports. Each row: frequency in Hz, phase lead of the left port in radians.
LEAD = [(30, 0.53), (110, 1.24), (260, 1.6324), (600, 1.29), (950, 0.9), (2400, 0.34), (4900, 0.64),
        (8000, 0)]


def roll_off(x):
    """The treble ends steeply here."""
    return signal.sosfilt(signal.butter(12, 16510, fs=SR, output="sos"), x)


def record(dry):
    """The left port leads the right in phase; a limiter holds the peaks; the click joins after it."""
    turned = filtered(dry.mean(0), lambda hz: 1j * np.tan(along(LEAD, hz) / 2))
    ports = (dry + [[1], [-1]] * turned) * level_to_linear([[.2], [-.2]])
    needed = np.minimum(1, level_to_linear(-5.0) / (np.abs(ports).max(0) + 1e-9))
    gain = uniform_filter1d(minimum_filter1d(needed, size=600), size=600)
    mix = ports * gain + jump()
    return roll_off(mix)


dry = scene()
out = record(dry)
put_to_file(out)
```